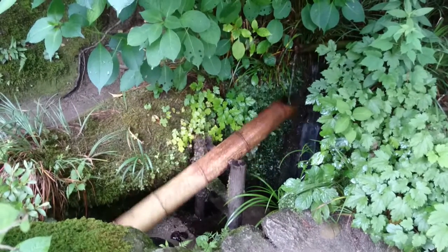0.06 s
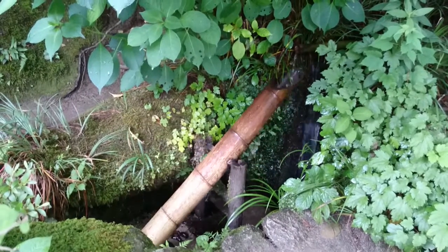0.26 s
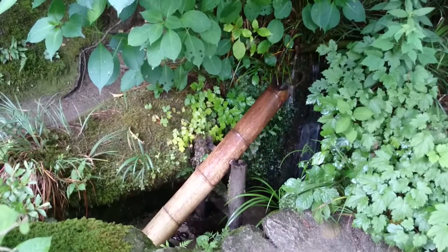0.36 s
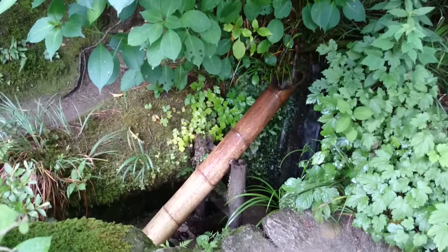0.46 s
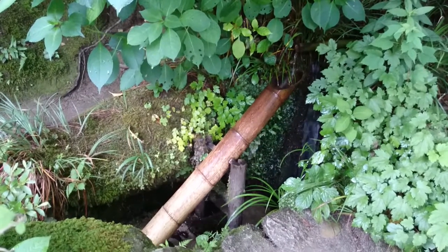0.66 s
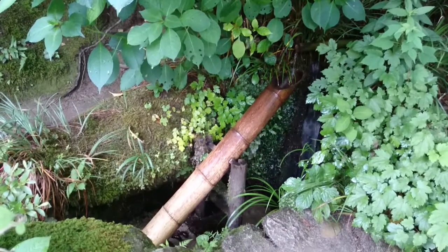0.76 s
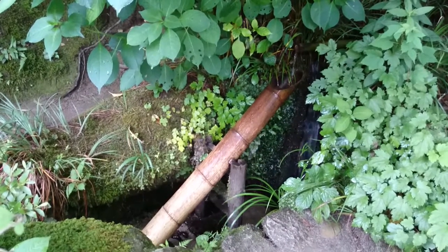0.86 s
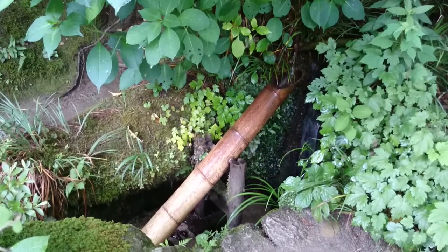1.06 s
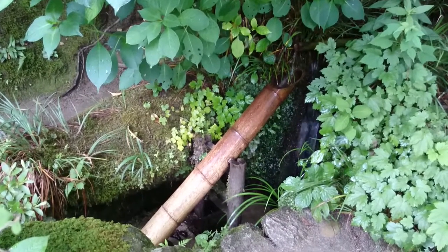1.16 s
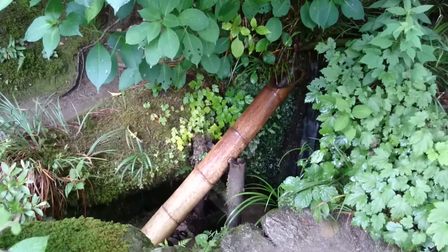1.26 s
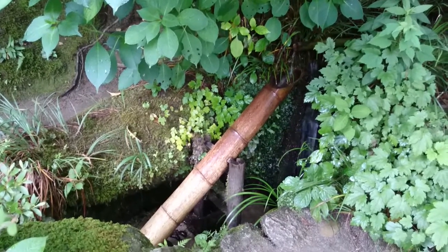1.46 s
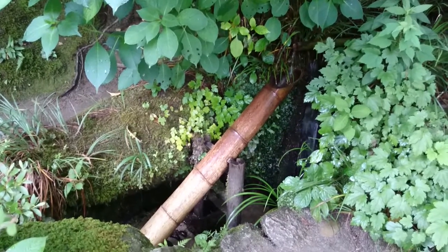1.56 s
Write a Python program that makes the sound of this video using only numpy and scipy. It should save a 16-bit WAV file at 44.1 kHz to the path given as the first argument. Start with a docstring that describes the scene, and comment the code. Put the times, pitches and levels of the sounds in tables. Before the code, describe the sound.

A bamboo water tube strikes a stone with one sharp, hollow knock, rattles faintly twice and settles with a soft bump. A thin garden stream splashes and bubbles quietly throughout. The knock slightly overloads the microphone.

```python
"""A bamboo water tube swings back, knocks its foot on a stone, rattles twice and settles with a soft
hollow bump. Each contact cracks, rings the wall and two air chambers, and bends the tube with a thud;
the mossy bank and the leaves add a short tail. Beside it a thin stream splashes, bubbles and faintly
whistles. The knock overloads a small camera's two microphones, unlike in colour and opposite in polarity."""
import sys
import numpy as np
from scipy import signal
from scipy.fft import rfft, irfft
from scipy.io import wavfile
from scipy.ndimage import uniform_filter1d

SR = 44100
rng = np.random.default_rng(int(sys.argv[2]) if len(sys.argv) > 2 else 0)


def int16_out(signal):
    """Quantize to a 16-bit WAV file."""
    q = np.round(np.clip(np.atleast_2d(signal).T, -1, 1) * 32767)
    wavfile.write(sys.argv[1], SR, q.astype(np.int16))


N = 70560

# Hits on the stone: start_s, long_chamber_db, short_chamber_db, wall_db, crack_db, thud_db,
# brightness_hz, ring_scale (0-1, shortens wall and crack as resting contact damps them)
HITS = [(.2258, -7.5, -21, 1.5, -3, -29, 13000, 0.96), (.2305, 0, 1, -13.5, -4, -35, 11200, 1),
        (.3060, -50, -30, -23, -19, -45, 2760, 0.7), (.3412, -52, -29.5, -43, -17.5, -46.5, 2310, 0.45),
        (0.345, -48, -33, -29, -19.5, -44, 2270, 0.53), (.3958, -60, -60, -56, -36, -64, 2660, 0.02),
        (.5288, -34.5, -38.5, -50, -24.5, -45.5, 900, .5)]
def bamboo():
    """Bamboo meets stone: every hit layers a crack, hollow air, a woody ring and a thud."""
    out = np.zeros((2, N))
    t = np.arange(SR) / SR
    for start_s, long_db, short_db, wall_db, crack_db, thud_db, brightness_hz, ring_scale in HITS:
        add(out, start_s, crack(t, crack_db, brightness_hz, ring_scale))
        add(out, start_s, chambers(t, long_db, short_db))
        add(out, start_s, amp(wall_db) * wall(t, ring_scale))
        add(out, start_s, amp(thud_db) * thud(t))
    return out


# Tone of the crack: freq_hz, gain_db
CRACK_EQ = [(60, -36), (300, -18.5), (700, -8.5), (1300, 6), (2000, -2), (2600, -3), (4000, -3),
            (7000, -12), (10000, -12), (16000, -12)]
# Its undamped decay: freq_hz, t60_s
CRACK_DECAY = [(200, 0.059), (1300, 0.11), (3000, 0.096), (7000, 0.071), (15000, 0.046)]
def crack(t, level_db, brightness_hz, ring_scale, trim_db=-6.5, attack_s=.00021):
    """Dense, short modes at the point of contact give the knock its edge."""
    burst = colour(decaying_noise([(hz, t60 * ring_scale) for hz, t60 in CRACK_DECAY]), CRACK_EQ)
    burst *= amp(trim_db + level_db) / np.std(burst[:, :SR // 100])  # level set on the first 10 ms
    burst *= 1 - np.exp(-t / attack_s)
    return butter(burst, 4, brightness_hz, "low")


# Air modes of the long and the short chamber: pitch_hz
LONG_PITCHES = [554, 732, 736, 767]
SHORT_PITCHES = [857, 853]
# For each pitch: level_db, t60_s
LONG_MODES = [(-26.5, 0.22), (-1, 0.094), (-28.5, 0.3), (-27, 0.12)]
SHORT_MODES = [(0, 0.077), (-23.5, 0.095)]
def chambers(t, long_db, short_db):
    """The air in the two chambers sings the hollow note."""
    long_note = amp(long_db) * ring(t, LONG_PITCHES, LONG_MODES)
    return long_note + amp(short_db) * ring(t, SHORT_PITCHES, SHORT_MODES)


# Modes of the bamboo wall, plus at 1465 Hz a tone an octave above the long chamber's note, all sounding with
# the first contact: pitch_hz
WALL_PITCHES = [1040, 1086, 1215, 1272, 1349, 1407, 1465, 1552, 1600, 1985, 2318, 2395, 2603, 2795]
# For each pitch, undamped: level_db, t60_s
WALL_MODES = [(-15.5, 0.089), (-14, 0.097), (-16.5, .09), (-12, 0.083), (-6.5, 0.092), (-12.5, 0.051),
              (-2, 0.063), (-27, 0.068), (-21, .085), (-18.5, .09), (-26.5, 0.14), (-24, 0.14),
              (-14.5, 0.086), (-34, 0.22)]
def wall(t, ring_scale):
    """The wall's woody ring blooms just behind the crack."""
    return ring(t, WALL_PITCHES, WALL_MODES, attack_s=.0039, lag_s=.00026, ring_scale=ring_scale)


# Bending modes of the tube: pitch_hz
BEND_PITCHES = [258, 348]
# For each pitch: level_db, t60_s
BEND_MODES = [(-8.5, 0.37), (-1.5, 0.22)]
def thud(t, centre_hz=140, t60_s=.07):
    """A low bump of noise, and the hum of the whole tube bending."""
    rumble = butter(rng.standard_normal(SR), 2, [centre_hz / 2, centre_hz * 2], "band")
    return unit(rumble) * fade(t, t60_s) + ring(t, BEND_PITCHES, BEND_MODES)


# Decay of the garden: freq_hz, t60_s
GARDEN_DECAY = [(100, 0.31), (700, 0.33), (1400, .27), (3000, 0.59), (6000, 0.41), (14000, 0.18)]
def garden_tail(knocks, wet_db=-22, predelay_s=.012):
    """The mossy bank and the leaves scatter the knocks into a short tail."""
    response = decaying_noise(GARDEN_DECAY)
    response /= np.linalg.norm(response[0])
    wet = np.zeros((2, N))
    add(wet, predelay_s, signal.fftconvolve(knocks, response, axes=1))
    return amp(wet_db) * wet


# Tone of splashing water: freq_hz, gain_db
WATER_EQ = [(20, 2), (45, -3), (100, -8), (220, -13.5), (500, -6.5), (850, -5), (1500, -1), (3000, -0.5),
            (5000, 2), (7500, -1), (10000, -1.5), (16000, -11.5)]
# Swell of the stream: time_s, level_db (played relative to its mean)
FLOW_SWELL = [(0, -56.5), (.52, -56.5), (.61, -57), (.72, -55.5), (.77, -58.5), (.9, -56.4), (0.999, -59),
              (1.22, -58), (1.26, -56), (1.33, -57), (1.37, -60.5), (1.46, -57), (1.6, -57.5)]
def splashing(wash_db=-49.5, spray_db=-54, likeness=.49):
    """Wash and spray swell with the flow, more diffuse in stereo than the tube."""
    times_s, flow_db = np.transpose(FLOW_SWELL)
    swell = amp(np.interp(np.arange(N) / SR, times_s, flow_db - flow_db.mean()))
    bed = amp(wash_db) * unit(colour(wash(likeness), WATER_EQ))
    sparkle = amp(spray_db) * unit(colour(spray(likeness), WATER_EQ))
    return swell * (bed + sparkle)


def wash(likeness, patchy_db=2.5, flicker_db=2.6):
    """Watery hiss that flickers, both in patches of the spectrum and as a whole."""
    _, frames, bands = signal.stft(diffuse(rng.standard_normal((2, N)), likeness), SR, nperseg=512)
    patches = uniform_filter1d(rng.standard_normal(bands.shape[1:]), size=7, axis=0)
    patches = unit(uniform_filter1d(patches, size=9, axis=1))
    flicker = unit(uniform_filter1d(rng.standard_normal(len(frames)), size=4))
    bands *= amp(patchy_db * patches + flicker_db * flicker)
    return signal.istft(bands, SR, nperseg=512)[1][:, :N]


def spray(likeness, drops_per_s=1500, spread_db=3.5):
    """Tiny impacts tick at random, a few much louder than the rest."""
    ticks = (rng.random((2, N)) < drops_per_s / SR) * rng.choice([-1, 1], (2, N))
    accent_db = spread_db * np.minimum(rng.exponential(1, (2, N)), 4.5)
    return diffuse(ticks * amp(accent_db), likeness)


# Single drops: start_s, level_db
DROP_SLAPS = [(.9012, -39), (.9276, -51), (1.152, -49), (1.242, -55)]
def slapping(t60_s=.045):
    """Drops slap the tube and the stone in short, wet bursts."""
    out = np.zeros((2, N))
    t = np.arange(SR // 10) / SR
    for start_s, level_db in DROP_SLAPS:
        splash = unit(colour(rng.standard_normal((2, len(t))), WATER_EQ))
        add(out, start_s, amp(level_db) * splash * fade(t, t60_s))
    return out


# Large bubbles: start_s, pitch_hz, level_db, decay_cycles
BUBBLE_PLINKS = [(.058, 2154, -41.5, 11), (0.573, 1680, -40, 10), (.586, 3610, -43, 70),
                 (.722, 1640, -46, 7.4), (.821, 2140, -44, 12), (1.025, 2630, -47, 12),
                 (1.095, 1480, -46, 10.4), (1.187, 2500, -45, 13), (1.31, 2520, -46.5, 33),
                 (1.462, 2630, -55, 12), (1.484, 4030, -41, 22)]
def bubbling(bed_db=-63, bubbles_per_s=290, low_hz=1507, high_hz=5040, mean_cycles=13, spread_db=4.5):
    """A bed of small bubbles with a few clear plinks on top."""
    out = np.zeros((2, N))
    for when, pitch, size, length in rng.random((round(bubbles_per_s * N / SR), 4)):
        pitch_hz = low_hz * (high_hz / low_hz) ** pitch
        add(out, when * N / SR, amp(spread_db * size) * bubble(pitch_hz, mean_cycles * (.5 + length)))
    out = amp(bed_db) * unit(out)
    for start_s, pitch_hz, level_db, decay_cycles in BUBBLE_PLINKS:
        add(out, start_s, amp(level_db) * bubble(pitch_hz, decay_cycles))
    return out


def bubble(pitch_hz, decay_cycles, glide=.011):
    """A bubble rings and rises slightly in pitch; each microphone gets it at its own phase."""
    turns = pitch_hz * np.arange(SR // 10) / SR
    age = turns / decay_cycles
    phase = 2 * np.pi * (turns * (1 + glide * np.minimum(age, 4) / 2) + rng.random((2, 1)))
    return (1 - np.exp(-turns / 2)) * np.exp(-age) * np.sin(phase)


# Thin whistles in the stream: start_s, length_s, pitch_hz, glide_hz_per_s, level_db
STREAM_WHISTLES = [(.6, .1, 3585, 8, -55.5), (.82, .18, 3870, 998, -55.5)]
def whistling(width_hz=190):
    """Narrow bands of hiss swell, slide up and fade."""
    out = np.zeros((2, N))
    for start_s, length_s, pitch_hz, glide, level_db in STREAM_WHISTLES:
        t = np.arange(0, length_s, 1 / SR)
        noise = rng.standard_normal((2, len(t))) + 1j * rng.standard_normal((2, len(t)))
        waver = butter(noise, 2, width_hz / 2, "low")
        tone = np.exp(2j * np.pi * (pitch_hz + glide * t / 2) * t)
        add(out, start_s, amp(level_db) * np.sin(np.pi * t / length_s) * unit((waver * tone).real))
    return out


def ring(t, pitches, modes, attack_s=.0013, lag_s=.00004, ring_scale=1):
    """Modes build up quickly and die away, reaching the right microphone lag_s later."""
    t = np.maximum(t - np.array([[0], [lag_s]]), 0)
    waves = sum(amp(db) * fade(t, t60 * ring_scale) * np.sin(2 * np.pi * hz * t)
                for hz, (db, t60) in zip(pitches, modes))
    return (1 - np.exp(-t / attack_s)) * waves


def decaying_noise(decay_curve):
    """Dense random ringing in which each band dies at its own speed."""
    hz, t, bands = signal.stft(diffuse(rng.standard_normal((2, SR))), SR, nperseg=256)
    bands *= amp(-60 * t / curve_at(decay_curve, hz)[:, None])
    return signal.istft(bands, SR, nperseg=256)[1][:, :SR]


# Likeness of left and right: freq_hz, correlation (0-1)
STEREO_LIKENESS = [(50, .95), (600, 1), (1400, 0.3), (3000, 0.4), (16000, 0.04)]
def diffuse(pair, likeness=1):
    """Blends two unrelated signals: alike in the lows, wide in the highs."""
    shared, separate = rfft(pair)
    hz = np.fft.rfftfreq(pair.shape[1], 1 / SR)
    same = likeness * curve_at(STEREO_LIKENESS, hz)
    left = same * shared + np.sqrt(1 - same ** 2) * separate
    return irfft(np.array([left, shared]), pair.shape[1])


def colour(x, eq, size=4096):
    """Minimum-phase EQ along a curve."""
    log_gain = np.log(amp(curve_at(eq, abs(np.fft.fftfreq(size, 1 / SR)))))
    taps = np.fft.ifft(np.exp(np.conj(signal.hilbert(log_gain)))).real[:size // 2]
    return signal.fftconvolve(x, np.array(taps, ndmin=x.ndim), axes=-1)[..., :x.shape[-1]]


def butter(x, order, cutoff_hz, kind):
    """Low-, high- or band-pass filter."""
    return signal.sosfilt(signal.butter(order, cutoff_hz, kind, fs=SR, output="sos"), x)


def curve_at(curve, hz):
    """Reads a curve on a log-frequency axis."""
    freqs_hz, values = np.transpose(curve)
    return np.interp(np.log(hz + 1), np.log(freqs_hz + 1), values)


def fade(t, t60_s):
    """Falls 60 dB in t60_s."""
    return np.exp(-np.log(1000) * t / t60_s)


def amp(db):
    """Decibels to gain."""
    return 10 ** (np.asarray(db) / 20)


def unit(x):
    """Scales to rms 1."""
    return x / np.sqrt(np.mean(x ** 2) + 1e-20)


def add(mix, start_s, sound):
    """Mixes a sound in at a time."""
    part = mix[:, round(start_s * SR):][:, :sound.shape[-1]]
    part += sound[..., :part.shape[1]]


def scene():
    """The knocks and their tail up front, the stream quietly behind."""
    knocks = bamboo()
    return knocks + garden_tail(knocks) + splashing() + slapping() + bubbling() + whistling()


# Colour of each microphone: freq_hz, gain_db
LEFT_MIC_EQ = [(100, 1.5), (500, -4.5), (800, -3), (1200, -2.5), (1500, -7), (2300, -1.5), (3400, -5),
               (4700, -10), (6500, 5.5), (8300, 3.5), (10500, -6), (13000, -12.5), (16000, -1.5)]
RIGHT_MIC_EQ = [(100, 4), (500, 2), (830, 6.5), (1150, -2), (1450, 6.5), (1850, 3), (2400, 7), (3900, 3.5),
                (6000, -3.5), (8000, -4), (10000, -9.5), (12500, 0), (16000, 0)]
def record(dry, knee=1.3, low_cut_hz=97, high_cut_hz=16000):
    """Two coloured microphones of opposite polarity overload; lows and extreme highs are cut."""
    mics = np.array([-colour(dry[0], LEFT_MIC_EQ), colour(dry[1], RIGHT_MIC_EQ)])
    saturated = mics / (1 + abs(mics) ** knee) ** (1 / knee)
    thinned = butter(saturated, 2, low_cut_hz, "high")
    high_cut = signal.firwin(511, high_cut_hz, window=("kaiser", 9), fs=SR)
    return signal.oaconvolve(thinned, high_cut[None], "same")


dry = scene()
out = record(dry)
int16_out(out)
```